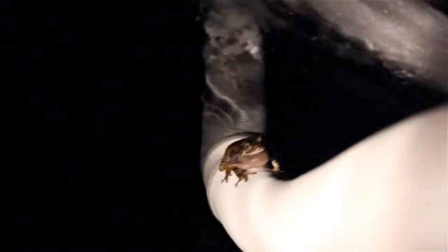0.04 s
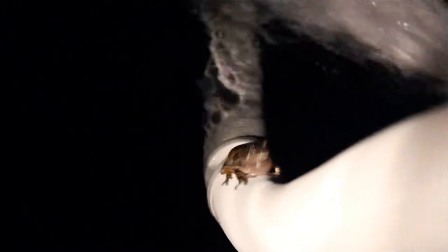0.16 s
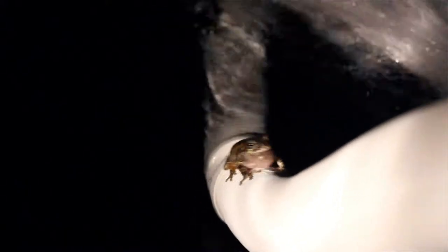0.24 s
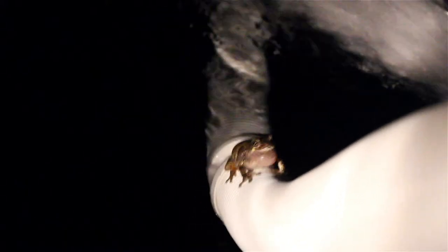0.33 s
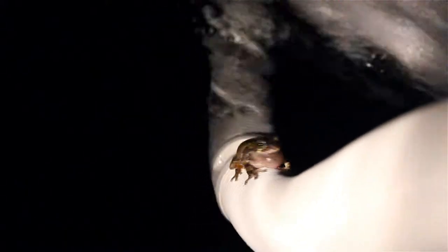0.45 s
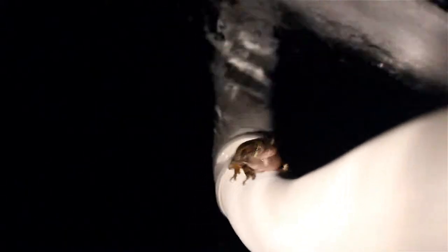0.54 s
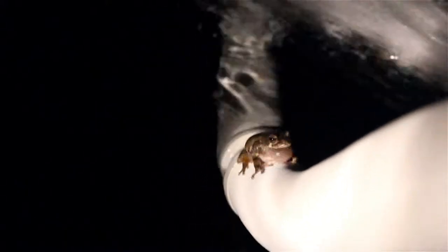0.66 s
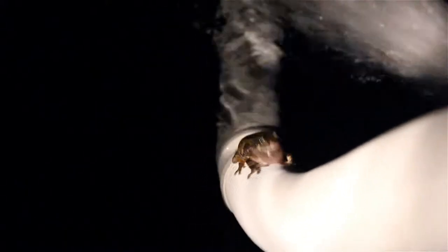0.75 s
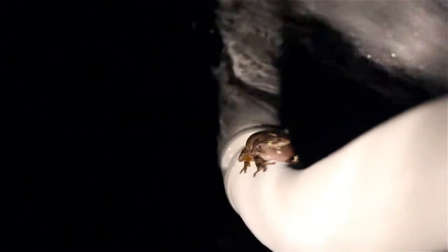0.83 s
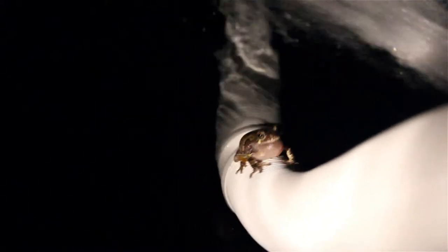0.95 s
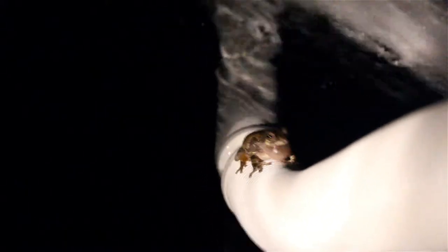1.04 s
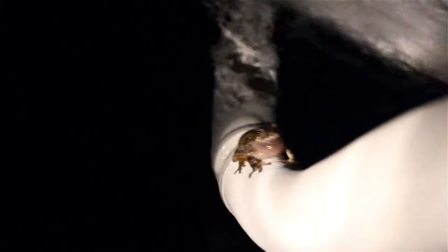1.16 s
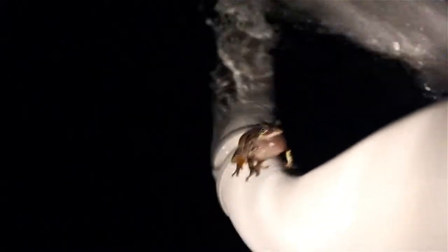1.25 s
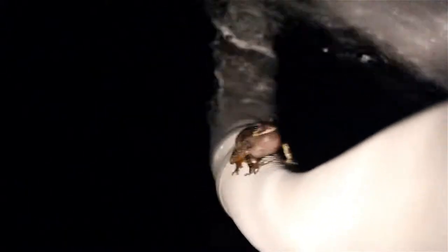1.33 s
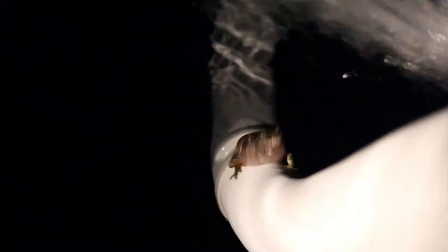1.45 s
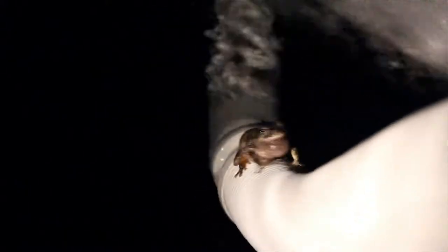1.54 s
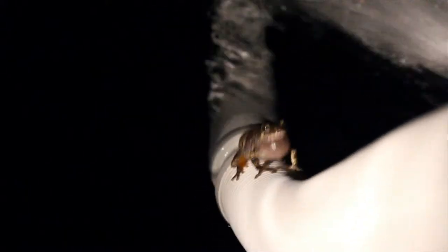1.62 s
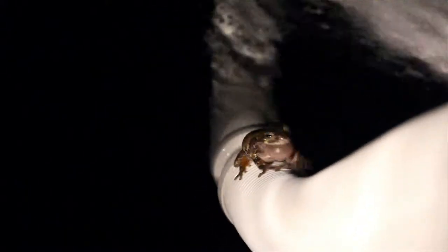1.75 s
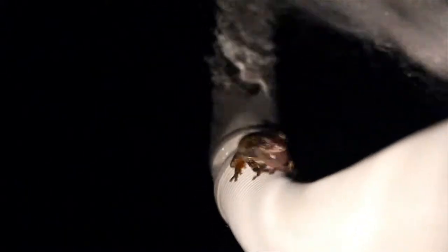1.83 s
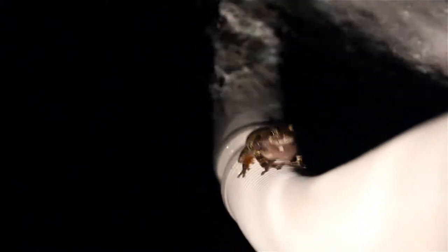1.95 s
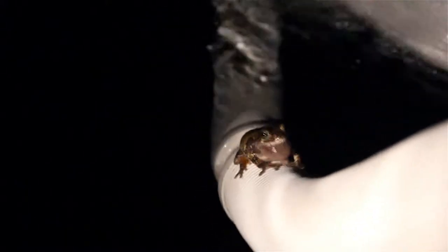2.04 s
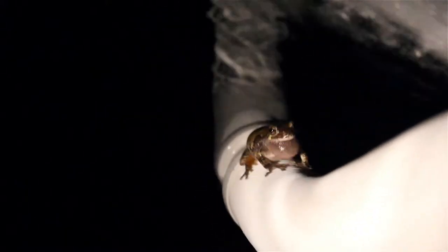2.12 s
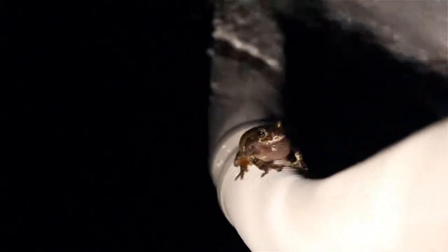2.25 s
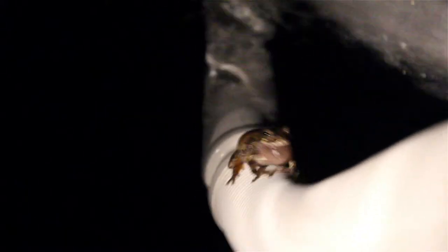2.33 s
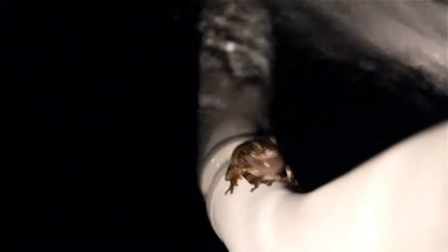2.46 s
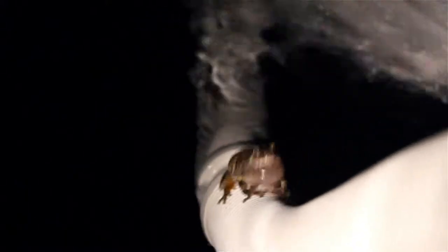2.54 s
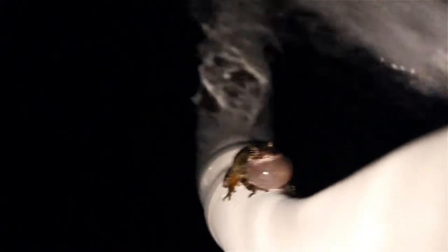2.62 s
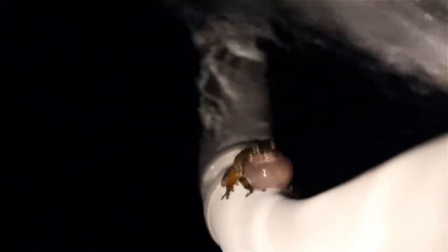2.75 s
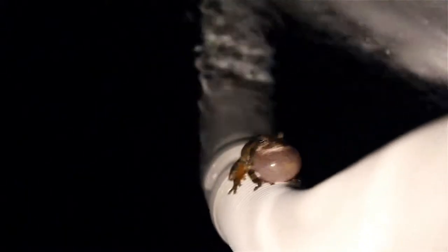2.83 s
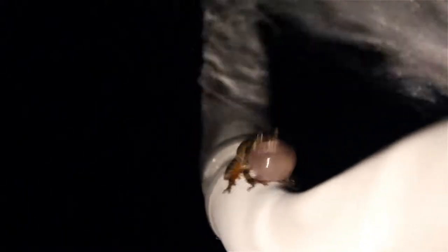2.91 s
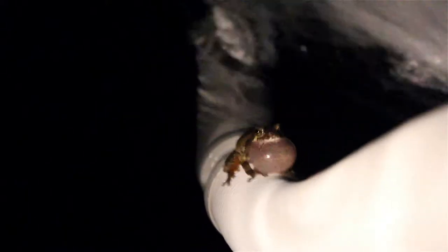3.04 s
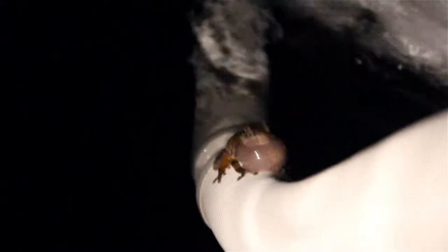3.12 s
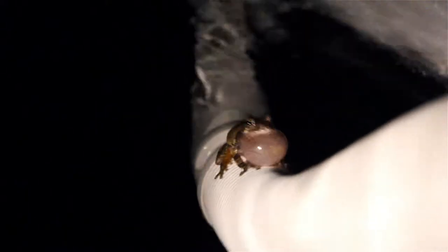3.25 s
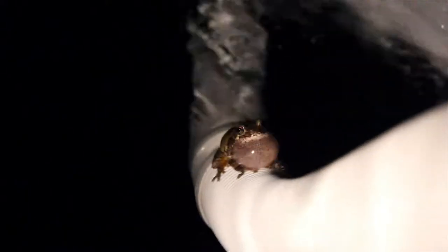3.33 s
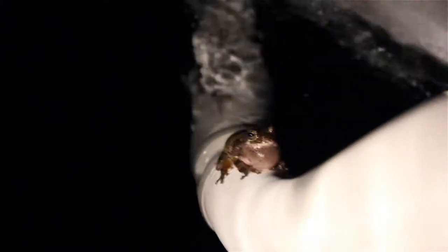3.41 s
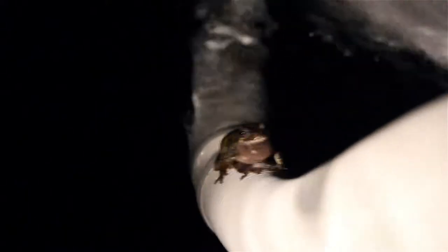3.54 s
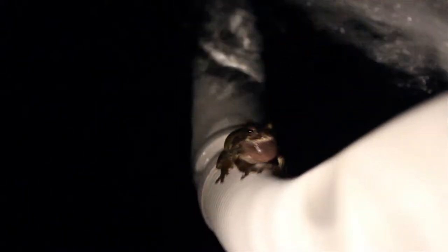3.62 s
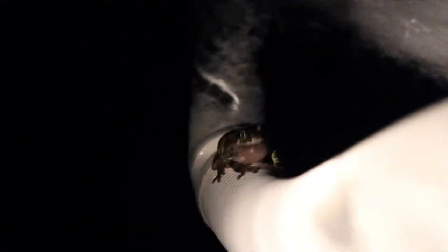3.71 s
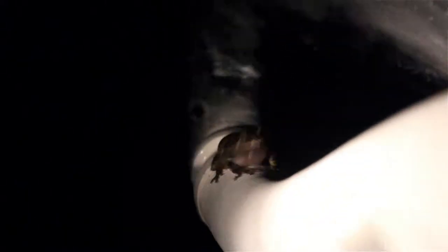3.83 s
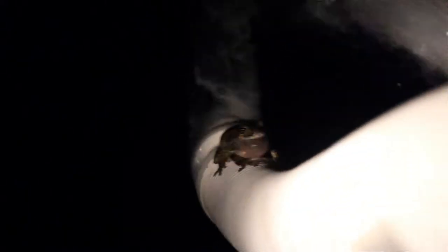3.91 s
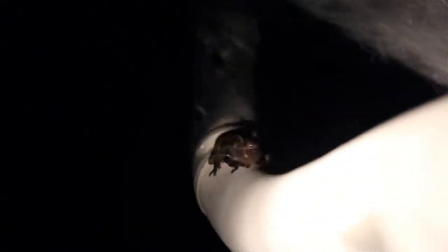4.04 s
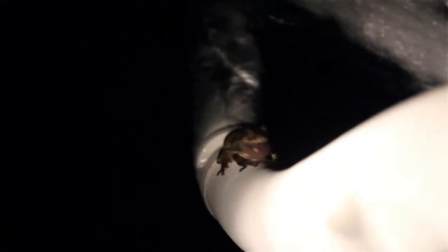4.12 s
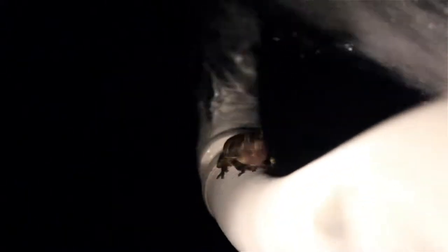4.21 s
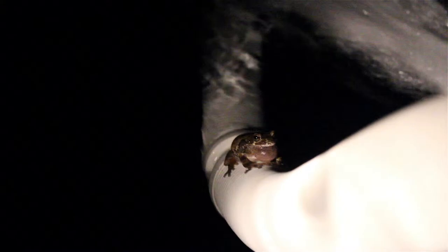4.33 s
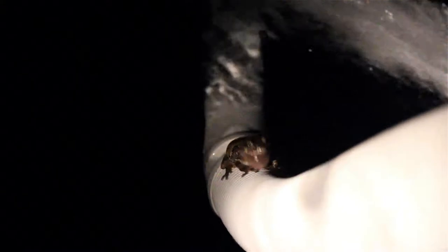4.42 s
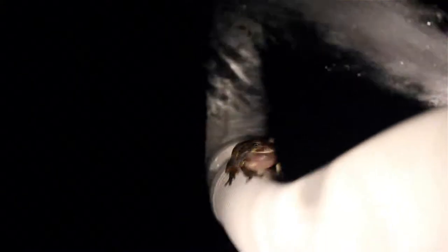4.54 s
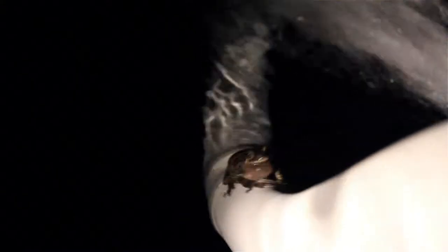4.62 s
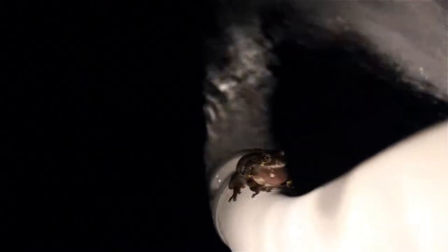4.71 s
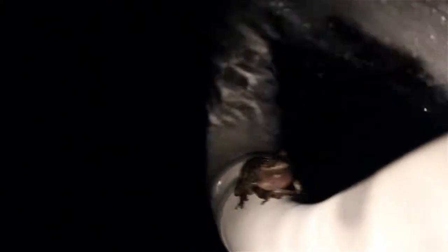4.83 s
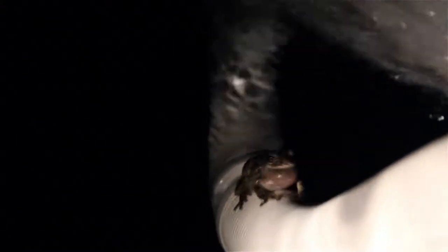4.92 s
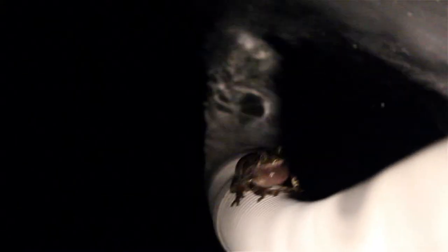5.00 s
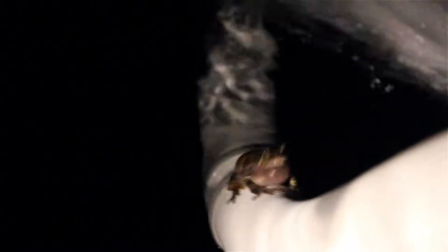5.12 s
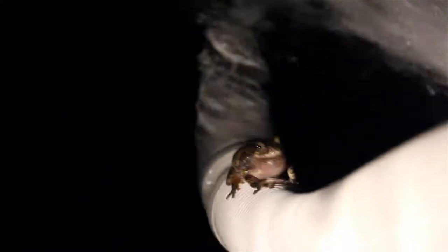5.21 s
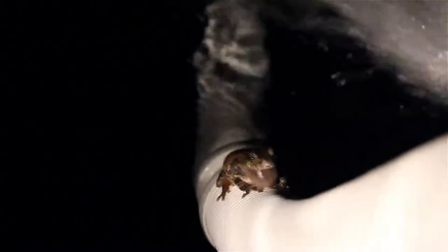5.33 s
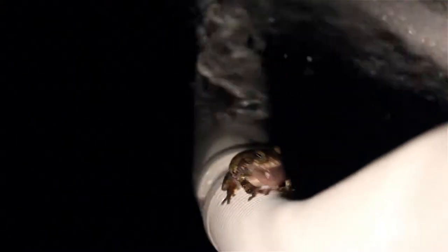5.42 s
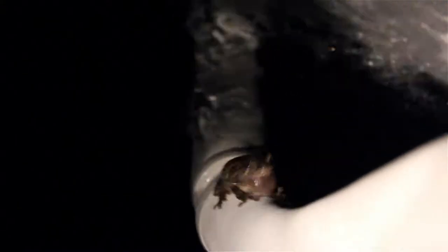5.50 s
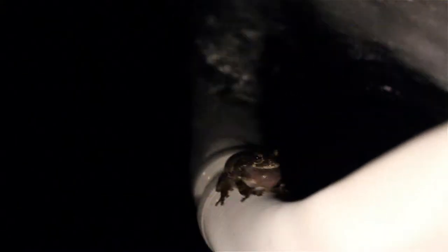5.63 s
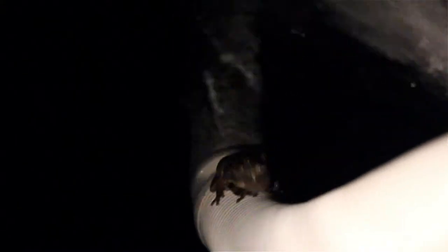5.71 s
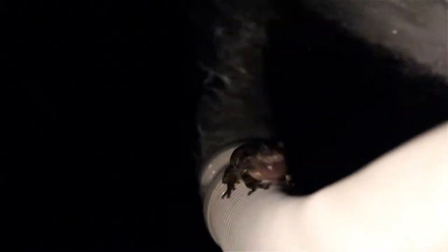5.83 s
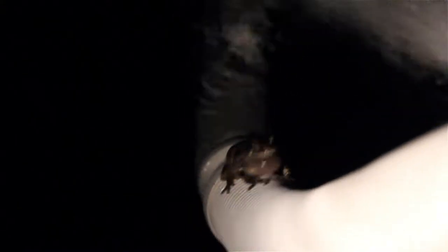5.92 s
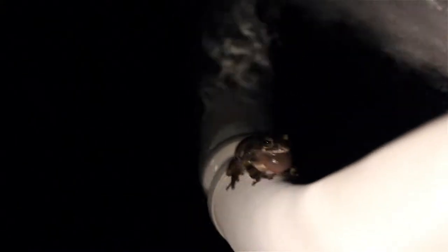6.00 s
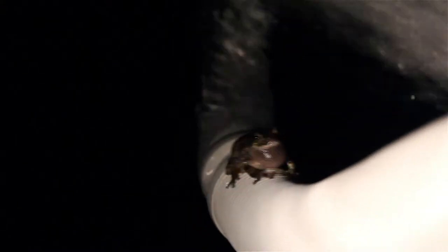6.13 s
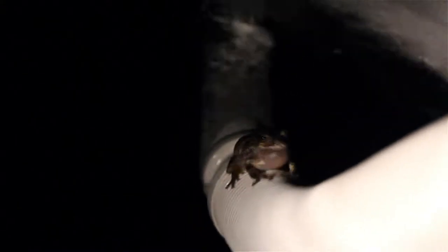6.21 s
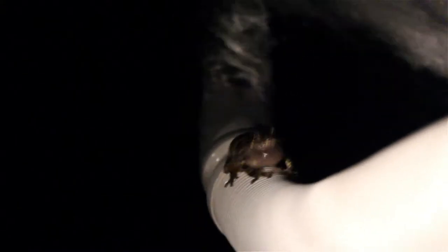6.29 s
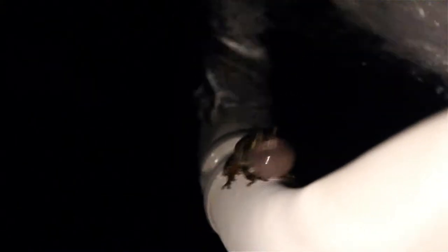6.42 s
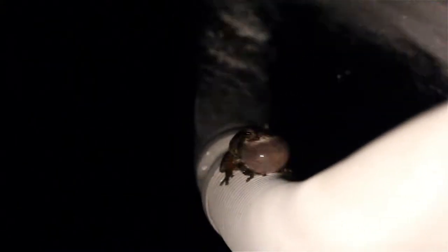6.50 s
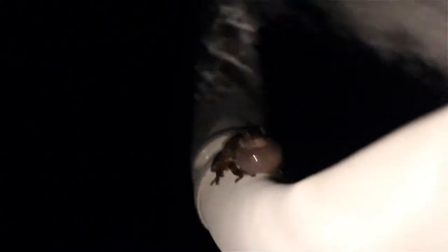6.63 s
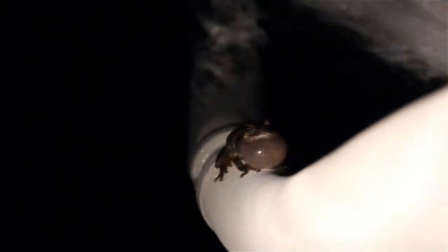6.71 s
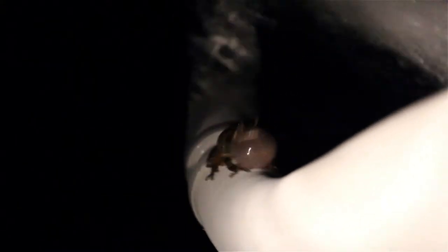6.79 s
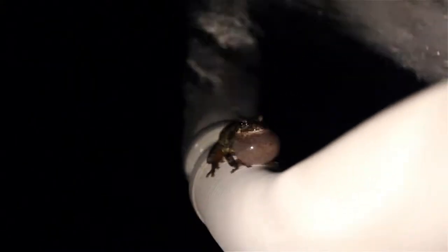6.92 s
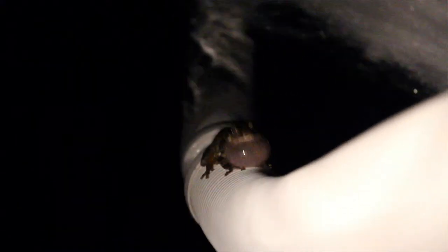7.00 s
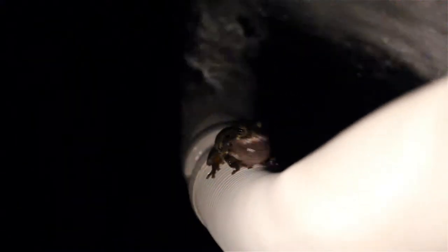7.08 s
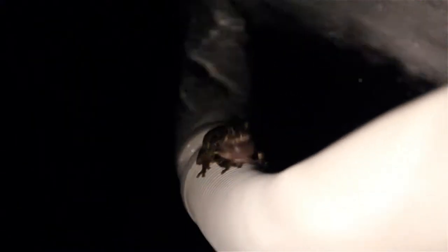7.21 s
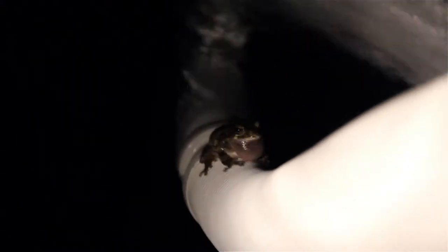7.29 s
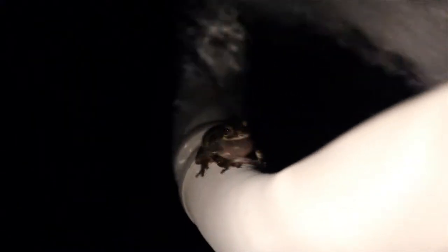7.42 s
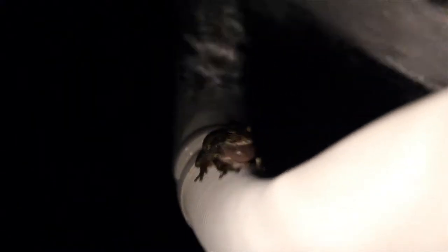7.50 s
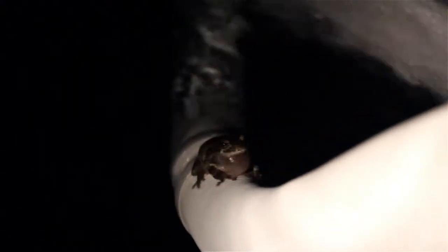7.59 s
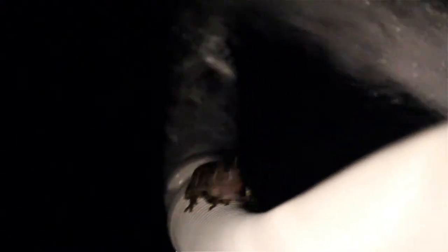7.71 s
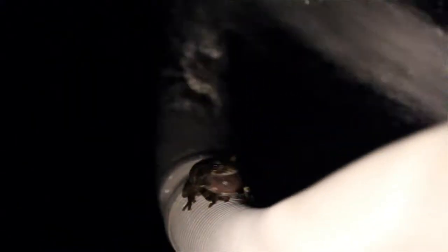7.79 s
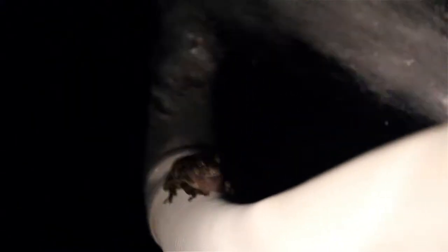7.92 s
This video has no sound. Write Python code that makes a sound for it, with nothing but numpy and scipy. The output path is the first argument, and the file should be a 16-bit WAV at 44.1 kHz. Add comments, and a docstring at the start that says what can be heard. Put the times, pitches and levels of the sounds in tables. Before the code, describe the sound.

A mono close outdoor night scene at a pool. From 0 to 2.6 seconds there is only soft running water: a steady thin hiss, a hollow gurgle, low rumble, little laps around 0.1, 0.6, 1.0 and 1.9 to 2.3, and ticking drips, clearest near 1.9 to 2.1. A pump hums very faintly beneath. At 2.6 a farther frog begins an echoing trill of doubled pulses, about 45 per second; at 2.7 the close frog enters louder and drier, about 48 rising chirps per second around 1.2 and 2.4 kilohertz, swelling fast. The near one ends at 3.4, the far one near 3.55. Water alone follows, with laps at 3.6, 4.2 and 5.4 and a lower plop at 5.8. The close frog trills again from 6.4 to 7.1; the far frog takes over just before it stops, lasting to about 7.95.

```python
"""A tree frog on the rim of a pool, close to the microphone, trills twice at night.
Each trill is a train of short rising chirps, each at a nearly random phase.
A second frog further off overlaps it with slower trills of doubled pulses, roughly in step with its
vocal sac's rings, under stronger echoes. Water, made of shaped noise, runs, laps and drips along the
pool wall. Behind it a pump hums faintly on a few unsteady sine lines."""
import sys
import numpy as np
from scipy import signal
from scipy.fft import rfft, irfft, next_fast_len
from scipy.io import wavfile
from scipy.ndimage import map_coordinates

SR = 44100
rng = np.random.default_rng(int(sys.argv[2]) if len(sys.argv) > 2 else 0)


def file_out(sig):
    """Save sig as 16-bit WAV at sys.argv[1]."""
    # one column per channel
    cols = np.atleast_2d(sig).T
    # limit, then scale
    lim = np.clip(cols, -1, 1)
    pcm = np.round(lim * 32767).astype(np.int16)
    wavfile.write(sys.argv[1], SR, pcm)


N = 350595

# Echoes around the pool: [f/Hz, decay by 60 dB t/s]
YARD_DECAY = [(300, 0.38), (1300, 0.22), (2500, 0.14), (10000, 0.17)]
# Pump lines: [f/Hz, rms level/dB before it wavers]
PUMP_LINES = [(120, -64.5), (295, -60), (360, -71), (419, -64.5)]
# Spectra of the stream and of its rumble: [f/Hz, relative level per Hz/dB]
FLOW_SPECTRUM = [(250, -25), (450, -16.5), (560, -2), (750, -2.5), (970, -4), (1300, -3), (1700, -2.5),
                 (2150, -6), (2480, -8.5), (2850, -5.5), (4000, -9), (6500, -16), (11500, -23.5),
                 (15500, -24)]
RUMBLE_SPECTRUM = [(20, -24), (45, -16), (65, -6.5), (90, -7.5), (140, -5), (220, 1), (290, -1),
                   (370, -4.5), (450, -0.5), (650, -53), (1200, -60)]
# Air cavity at the pool wall: [f/Hz, width f/Hz, relative level/dB]
HOLLOW_MODES = [(555.7, 61, -0.5), (678, 76, -4), (777, 84, -4)]
# Larger wavelets at the wall: [t/s, number of slaps, then relative level/dB of hollow ring, thump, splash]
WAVELETS = [(0.091, 2, -35.5, -36, -30), (0.609, 3, -32.5, -50, -46), (1.002, 1, -41, -44, -38),
            (1.852, 1, -31, -57, -27), (2.067, 2, -33.5, -34.5, -28.5), (2.301, 1, -37, -56, -26.5),
            (3.582, 2, -32.5, -47, -32), (4.208, 1, -35.5, -46, -48), (5.399, 1, -30, -36, -27.5),
            (6.421, 1, -30, -43, -28), (6.496, 1, -31.5, -45, -24), (7.076, 1, -33.5, -40, -33)]
# A typical small ripple: [relative level/dB of hollow ring, thump, splash]
RIPPLE_LEVELS = (-42, -46, -31)
# The clearest drips: [t/s, relative level/dB, f/Hz, width/octaves]
CLEAR_DRIPS = [(1.0, -32, 2680, .08), (1.356, -33, 9000, .3), (1.856, -24.5, 2940, 0.16),
               (2.064, -24, 5400, 0.13), (4.273, -38, 10000, .3), (4.447, -34.5, 6000, .2),
               (5.735, -30, 1400, 0.11), (5.808, -21, 1330, 0.11), (7.076, -25, 6100, 0.084),
               (7.078, -27, 9500, .4)]
# Trills: [start t/s, end t/s, settled pulses/s, extra pulses/s at the start, pulses/s lost at the end,
#          first pulse relative level/dB, full relative level/dB]
FAR_TRILLS = [(2.6023, 3.564, 44.69, 5.3, 3.7, -42, -20.8), (7.0742, 7.95, 44.78, 4.05, 0, -42, -21.7)]
NEAR_TRILLS = [(2.684, 3.397, 47.47, 4.27, 10.5, -34, -12.2), (6.4335, 7.096, 47.55, 4.78, 3.1, -42, -13)]
# Chirps in one pulse: [delay t/s, length t/s, start f/Hz, end f/Hz, glide exponent,
#                       peak lateness exponent, relative level/dB]
FAR_CHIRPS = [(0, 0.00876, 1050, 1270, 1.41, 1.92, -0.23), (0.0097, 0.0082, 1129, 1230, 2.7, 1.54, 0.1)]
NEAR_CHIRPS = [(0.0012, 0.0074, 1079, 1355, 0.97, 1.23, 1.37)]
# Faint overtones above the octave: [multiple of the pitch, relative level/dB]
FAR_OVERTONES = [(3, -26.5)]
NEAR_OVERTONES = [(3, -27.5), (4, -34), (7, -42.5), (8, -45)]
# Steady rings of the vocal sac, a phase reference: [lower f/Hz, upper f/Hz]
SAC_RINGS = [(1207, 2303)]
# Throat resonance of the fundamental: [f/Hz, width f/Hz, level/dB]
THROAT_MODES = [(1490, 313, 1.5)]
# Thin ring of the close frog: [f/Hz, width f/Hz, level/dB]
SHEEN_MODES = [(8400, 150, 13)]

MIC_TOP_HZ = 15740
SLAP_GAP_S, SLAP_LOSS_DB = 0.0396, 2.5  # a wavelet sloshes back and slaps again, a little weaker
RIPPLE_SPREAD_DB = 1
DRIP_T60_S, DRIP_OCTAVES = 0.031, 0.094  # decay of a drip of this width; narrower ones ring longer
PATTER_DB, PATTER_RANGE_DB = -46.5, 14  # lowest relative level of faint droplets, and its range
PATTER_LOW_HZ, PATTER_OCTAVES = 1500, 2.8  # lowest pitch of faint droplets, and its range
# time constants: to settle after the eager start, to tire at the end
FAR_SETTLE_S, FAR_TIRE_S = 0.3, 0.07
NEAR_SETTLE_S, NEAR_TIRE_S = 0.2, 0.04
SWELL_S = 0.048  # time constant of a trill closing in on its full level


def amp(db):
    """Decibels to gain."""
    return 10 ** (np.asarray(db) / 20)


def unit(x):
    """Scale to rms 1."""
    return x / np.sqrt(np.mean(x ** 2) + 1e-20)


def along(points, hz):
    """Interpolate (f/Hz, value) points on a log frequency axis."""
    f, v = np.transpose(points)
    return np.interp(np.log(hz + 1), np.log(f + 1), v)


def wobble(rate):
    """A smooth random curve with rate knots a second."""
    steps = np.arange(0, N + 32, 32)
    knots = rng.standard_normal(2000)
    curve = map_coordinates(knots, [steps * rate / SR])
    return np.interp(np.arange(N), steps, curve)


def filtered(x, response):
    """Multiply the spectrum of x by a response of frequency."""
    size = next_fast_len(len(x) + SR // 10, real=True)
    spectrum = rfft(x, size) * response(np.fft.rfftfreq(size, 1 / SR))
    return irfft(spectrum, size)[:len(x)]


def resonances(modes):
    """Causal response of damped (f/Hz, width f/Hz, level/dB) modes with alternating signs."""
    def response(f):
        return sum((-1) ** k * amp(db) * 1j * f * width / (centre ** 2 - f * f + 1j * f * width)
                   for k, (centre, width, db) in enumerate(modes))
    return response


def band(centre_hz, octaves):
    """A bell-shaped response on a log frequency axis."""
    return lambda f: np.exp(-0.5 * (np.log2((f + 1) / centre_hz) / octaves) ** 2)


def noise(response, size=N):
    """Coloured noise of rms 1."""
    return unit(filtered(rng.standard_normal(size), response))


def burst(rise, t60):
    """A quick swell and an exponential decay, peak 1."""
    t = np.arange(SR // 3) / SR
    shape = (1 - np.exp(-t / rise)) * amp(-60 * t / t60)
    return shape / shape.max()


def add(track, s, sound):
    """Mix a sound into the track at time s."""
    part = track[max(round(s * SR), 0):][:len(sound)]
    part += sound[:len(part)]


def yard(x):
    """Scattered echoes from water and walls: decaying noise, longest in the bass."""
    hz, t, cells = signal.stft(rng.standard_normal(SR // 3), SR, nperseg=256)
    decay = amp(-60 * t / along(YARD_DECAY, hz)[:, None])
    tail = signal.istft(cells * decay, SR, nperseg=256)[1]
    return signal.fftconvolve(x, tail / np.linalg.norm(tail))[:N]


def pump():
    """Motor lines as sines, slightly unsteady in level and phase."""
    t = np.arange(N) / SR
    hum = np.zeros(N)
    for hz, db in PUMP_LINES:
        level = np.sqrt(2) * amp(db + 2.8 * wobble(4.5))
        hum += level * np.sin(2 * np.pi * hz * t + 0.73 * wobble(7.5))
    return hum


def running_water():
    """A thin stream hisses and gurgles in the hollow by the wall, over a low rumble."""
    surge_db = 0.25 * wobble(5.3)  # shared by hiss and trickle
    hiss_db = -40.0 + surge_db + 1.01 * wobble(90)
    hiss = amp(hiss_db) * noise(lambda f: amp(along(FLOW_SPECTRUM, f)))
    trickle = amp(-52.0 + surge_db + 3.1 * wobble(70)) * noise(band(1810, 0.3))
    gurgle_db = -53.5 + 2.9 * wobble(5) + 3.1 * wobble(35)
    gurgle = amp(gurgle_db) * noise(resonances(HOLLOW_MODES))
    rumble = amp(-54.5 + 1.2 * wobble(18)) * noise(lambda f: amp(along(RUMBLE_SPECTRUM, f)))
    return hiss + trickle + gurgle + rumble


def slaps():
    """Time and three levels of every slap: wavelets sloshing to and fro, small ripples at random."""
    rows = []
    for s, count, *levels in WAVELETS:
        for k in range(round(count)):
            rows.append((s + k * SLAP_GAP_S, *(np.array(levels) - k * SLAP_LOSS_DB)))
    times = rng.uniform(0, N / SR, size=12)
    levels = RIPPLE_LEVELS + RIPPLE_SPREAD_DB * rng.standard_normal(size=(len(times), 3))
    return rows + list(np.column_stack([times, levels]))


def laps():
    """Each lap rings the hollow, thumps the wall and splashes: three bands of noise in bursts."""
    ring, thump, splash = np.zeros((3, N))
    for s, ring_db, thump_db, splash_db in slaps():
        add(ring, s, amp(ring_db - 5.0) * burst(0.0041, 0.14))
        add(thump, s, amp(thump_db - 6.0) * burst(0.012, 0.11))
        add(splash, s, amp(splash_db - 9.5) * burst(0.0047, 0.084))
    ring *= noise(lambda f: resonances(HOLLOW_MODES)(f) ** 2)
    thump *= noise(band(297, 0.29))
    splash *= noise(band(1570, 0.69))
    return ring + thump + splash


def drips():
    """Droplets burst as short ticks of noise around their own pitch, among a fine random patter."""
    out = np.zeros(N)
    patter = [(s * N / SR, PATTER_DB + PATTER_RANGE_DB * size,
               PATTER_LOW_HZ * 2 ** (PATTER_OCTAVES * height), 0.25)
              for s, size, height in rng.random(size=(40, 3))]
    for s, db, hz, octaves in list(CLEAR_DRIPS) + patter:
        shape = burst(0.0013, DRIP_T60_S * np.sqrt(DRIP_OCTAVES / octaves))
        add(out, s, amp(db - 8.5) * shape * noise(band(hz, octaves), size=len(shape)))
    return out


def pulses(trills, settle_s, tire_s, jitter_s, scatter_db):
    """(t/s, level/dB) of every pulse: fast and soft at first, swelling as the pace settles, then tiring."""
    rows = []
    for start, end, settled, eager, tired, first_db, full_db in trills:
        t = np.arange(0, end - start, 1 / SR)
        rate = settled + eager * np.exp(-t / settle_s) - tired * np.exp((t - t[-1]) / tire_s)
        turns = np.cumsum(rate) / SR
        # one pulse at each whole turn
        age = np.interp(np.arange(int(turns[-1]) + 1), turns, t)
        level_db = full_db + (first_db - full_db) * np.exp(-age / SWELL_S)
        rows += zip(start + age, level_db)
    return rows + rng.standard_normal((len(rows), 2)) * [jitter_s, scatter_db]


def set_phase(chirp, t, ring_hz, slip):
    """Align a complex chirp to a steady ring, then turn it by a random slip (radians, std); large = no lock."""
    ahead = np.angle(np.sum(chirp * np.exp(-2j * np.pi * ring_hz * t)))
    return np.real(chirp * np.exp(1j * (slip * rng.normal() - ahead)))


def frog(beats, chirps, overtones, lead, swell, base_db, base_growth, slip, flutter, drift):
    """Each pulse of air sets the larynx gliding upward; returns its fundamental and its overtones."""
    base, upper = np.zeros(N), np.zeros(N)
    lower_hz, upper_hz = SAC_RINGS[0]  # only a small slip keeps the chirps in step with these
    full_db = beats[:, 1].max()
    t = np.arange(SR // 70) / SR
    wander_s = 0.000973 * wobble(3)  # the reference ring drifts slowly ahead and behind
    for s, db in beats:
        ring_t = t + wander_s[min(round(s * SR), N - 1)]
        for delay, length, start_hz, end_hz, bend, late, chirp_db in chirps:
            start = round((s + delay - lead) * SR) / SR
            u = np.minimum(t / length, 1)  # progress through the chirp
            glide = start_hz + (end_hz - start_hz) * u ** bend
            hz = glide * (1 + drift * rng.normal())
            phase = 2 * np.pi * np.cumsum(hz) / SR
            uneven = 1 + flutter * map_coordinates(rng.standard_normal(size=6), [u * 5])
            shape = amp(db + chirp_db) * np.abs(np.sin(np.pi * u ** late)) ** swell * uneven
            # soft pulses are richer in fundamental; the octave above it carries the call
            share = amp(base_db + base_growth * (full_db - db))
            fundamental = set_phase(shape * np.exp(1j * phase), start + ring_t, lower_hz, 2 * slip)
            octave = set_phase(shape * np.exp(2j * phase), start + ring_t, upper_hz, slip)
            add(base, start, share * fundamental)
            add(upper, start, octave)
            faint = sum(amp(level) * np.sin(round(k) * phase) for k, level in overtones)
            add(upper, start, shape * faint)
    return base, upper


def far_frog():
    """The neighbour further off: an evenly timed trill, every pulse split in two, under stronger echoes."""
    beats = pulses(FAR_TRILLS, FAR_SETTLE_S, FAR_TIRE_S, jitter_s=0.0001, scatter_db=0.4)
    # the small slip keeps its chirps roughly in step with the sac
    base, upper = frog(beats, FAR_CHIRPS, FAR_OVERTONES, lead=0.0056, swell=0.43, base_db=-6.5,
                       base_growth=0.84, slip=0.35, flutter=0.17, drift=0.016)
    base = filtered(base, resonances(THROAT_MODES))
    echoes = amp(-5.0) * yard(base) + amp(-15.5) * yard(upper)
    return base + upper + echoes


def near_frog():
    """The close frog: single forceful pulses, whose fundamental rings on briefly in the throat."""
    beats = pulses(NEAR_TRILLS, NEAR_SETTLE_S, NEAR_TIRE_S, jitter_s=0.0002, scatter_db=0.45)
    # the wide slip leaves the phase of each chirp nearly random
    base, upper = frog(beats, NEAR_CHIRPS, NEAR_OVERTONES, lead=0.0046, swell=0.73, base_db=-7.0,
                       base_growth=0.56, slip=2.04, flutter=0.079, drift=0.005)
    base = filtered(base, resonances(THROAT_MODES))
    sheen = filtered(upper, resonances(SHEEN_MODES))
    echoes = amp(-11.5) * yard(base) + amp(-16) * yard(upper)
    return base + upper + sheen + echoes


def scene():
    """Two frogs over the water and the pump, on one channel."""
    water = running_water() + laps() + drips()
    return (pump() + water + far_frog() + near_frog())[None]


def record(dry):
    """The microphone keeps nothing above its band limit."""
    return np.array([filtered(channel, lambda hz: hz < MIC_TOP_HZ) for channel in dry])


dry = scene()
out = record(dry)
file_out(out)
```